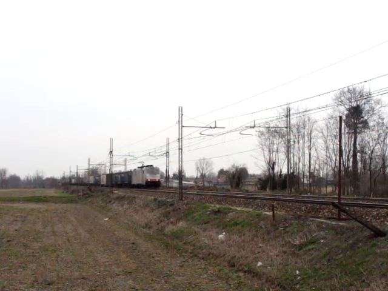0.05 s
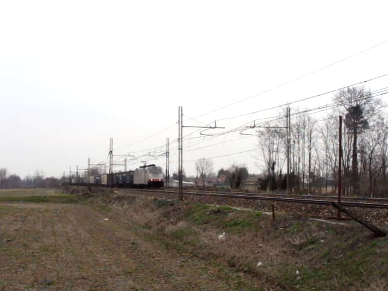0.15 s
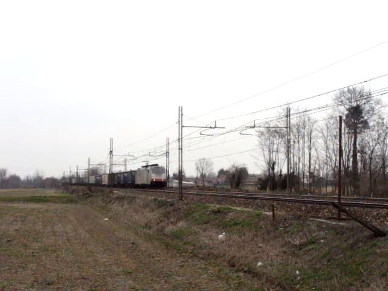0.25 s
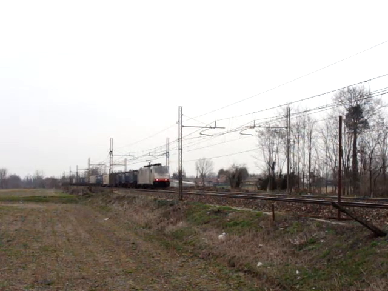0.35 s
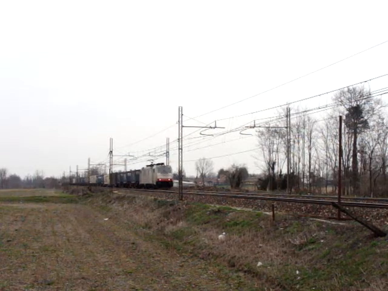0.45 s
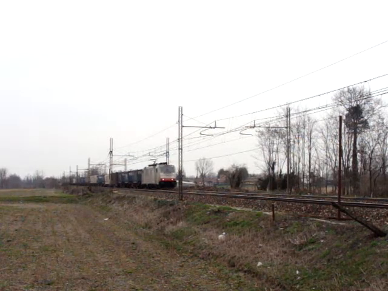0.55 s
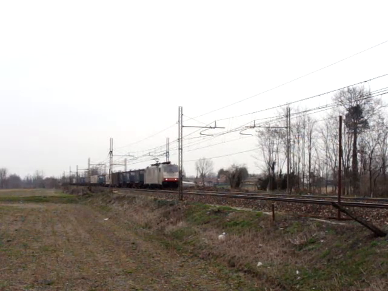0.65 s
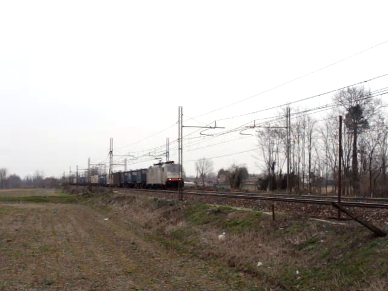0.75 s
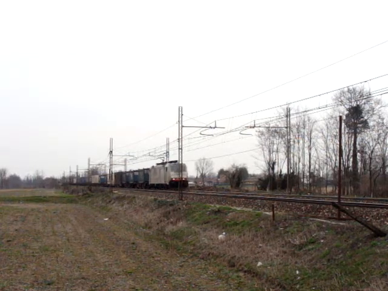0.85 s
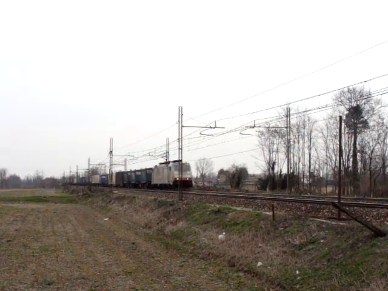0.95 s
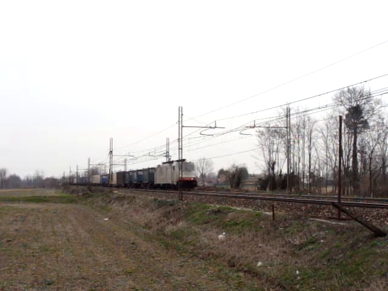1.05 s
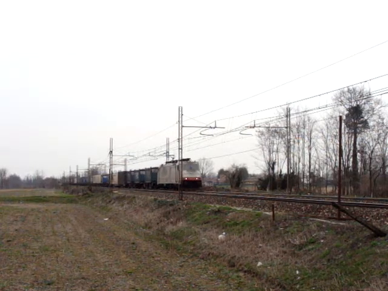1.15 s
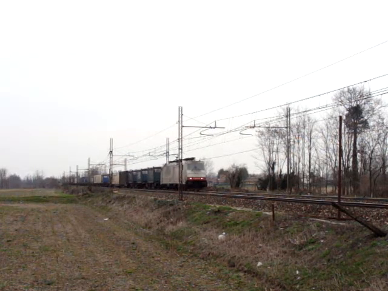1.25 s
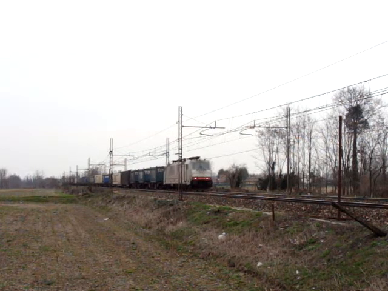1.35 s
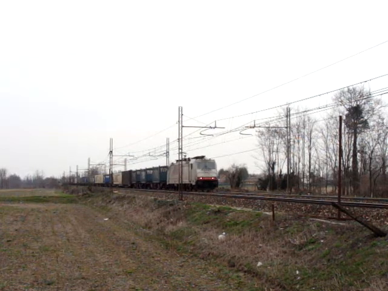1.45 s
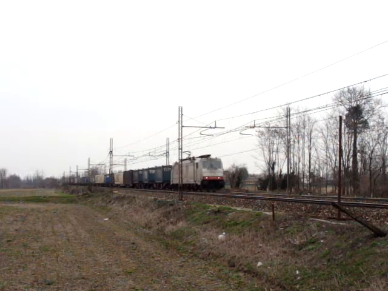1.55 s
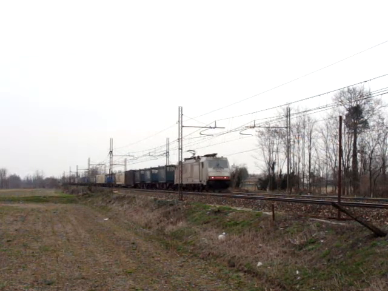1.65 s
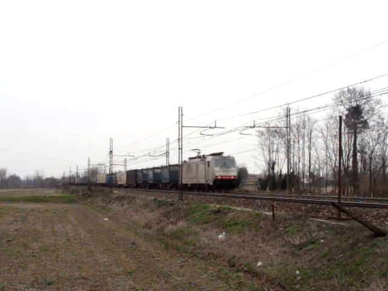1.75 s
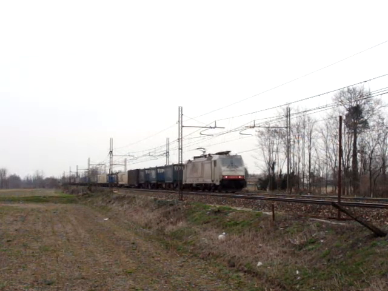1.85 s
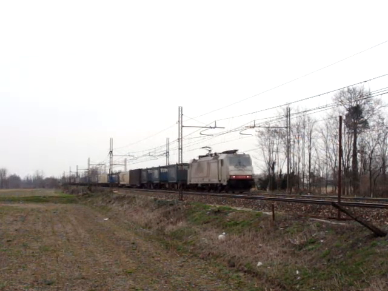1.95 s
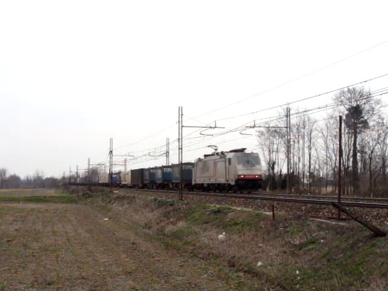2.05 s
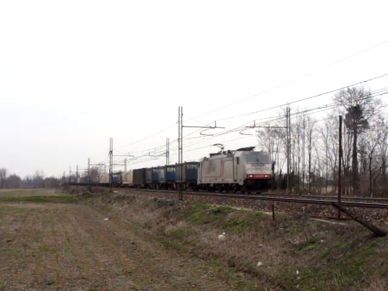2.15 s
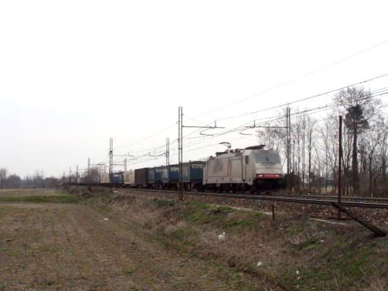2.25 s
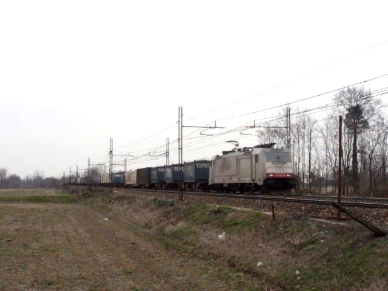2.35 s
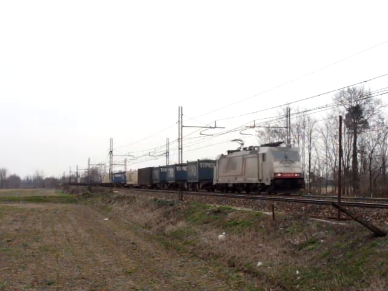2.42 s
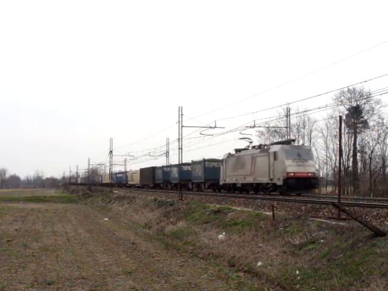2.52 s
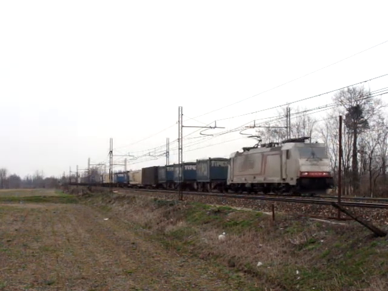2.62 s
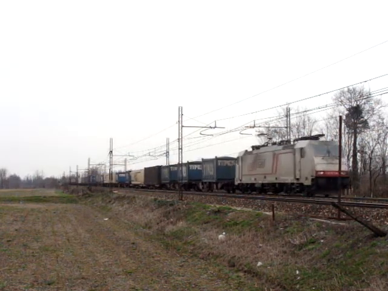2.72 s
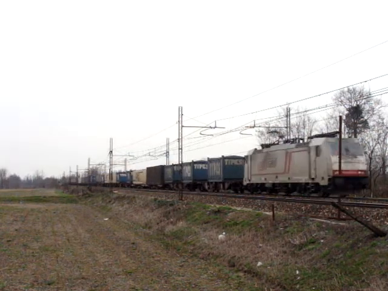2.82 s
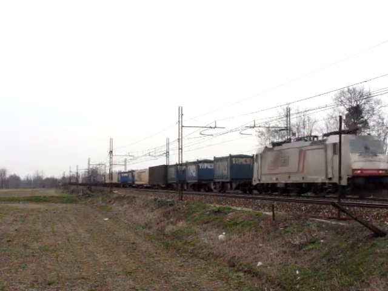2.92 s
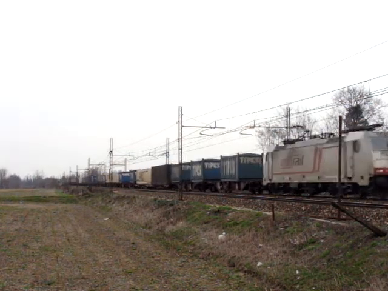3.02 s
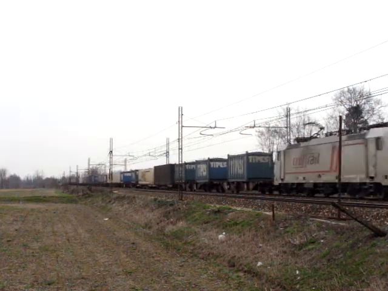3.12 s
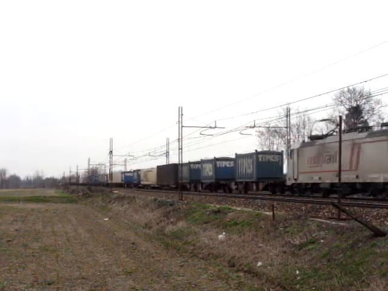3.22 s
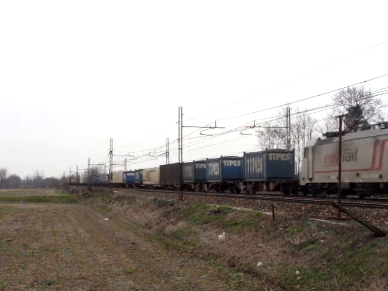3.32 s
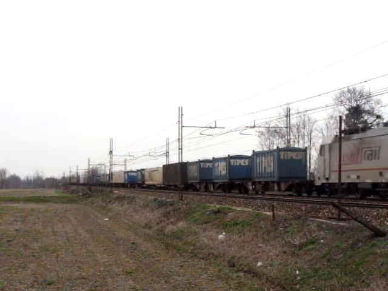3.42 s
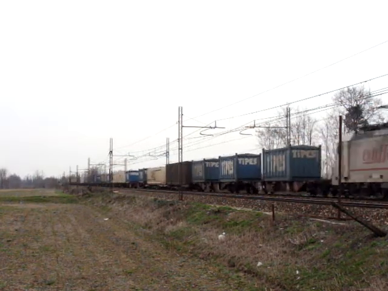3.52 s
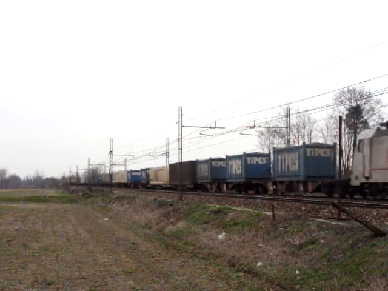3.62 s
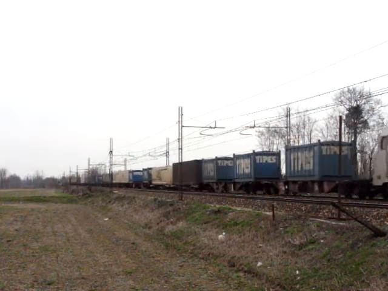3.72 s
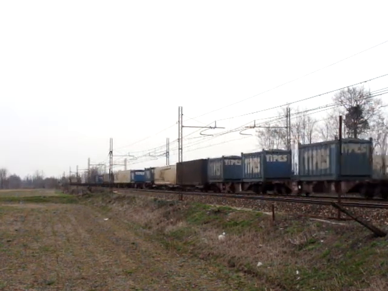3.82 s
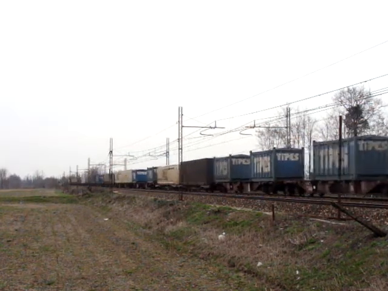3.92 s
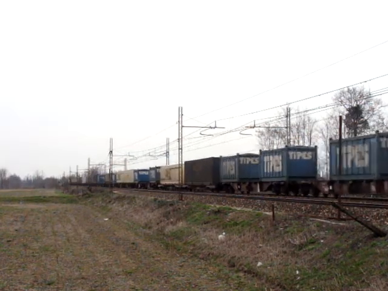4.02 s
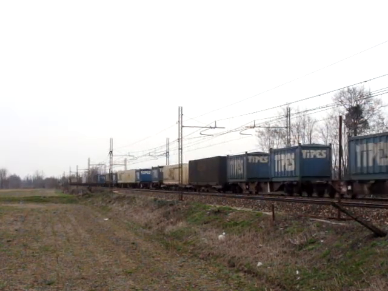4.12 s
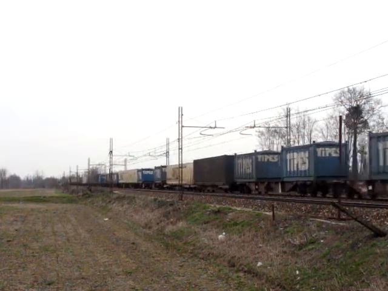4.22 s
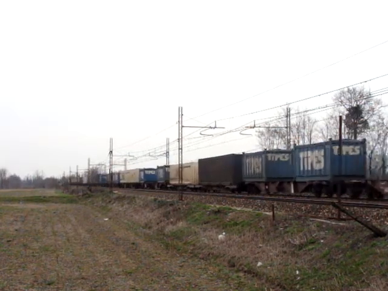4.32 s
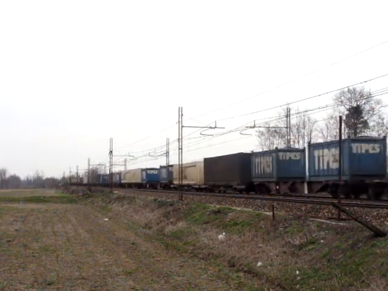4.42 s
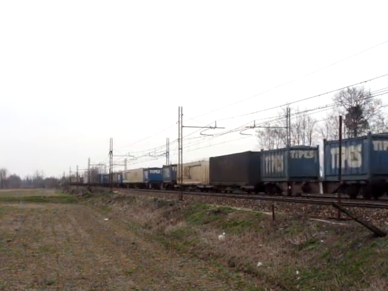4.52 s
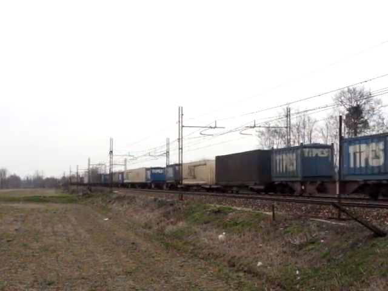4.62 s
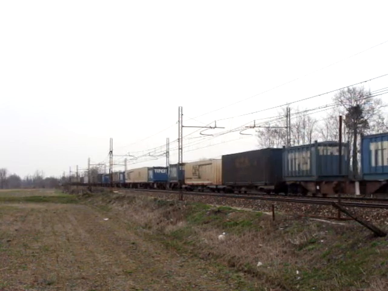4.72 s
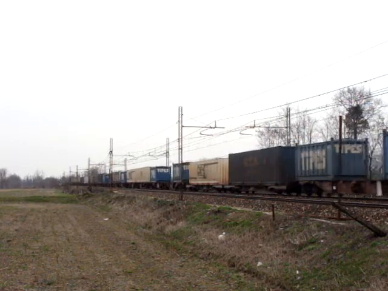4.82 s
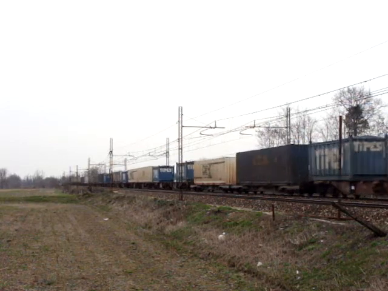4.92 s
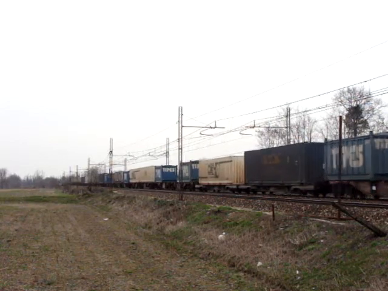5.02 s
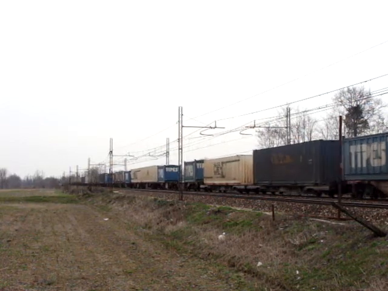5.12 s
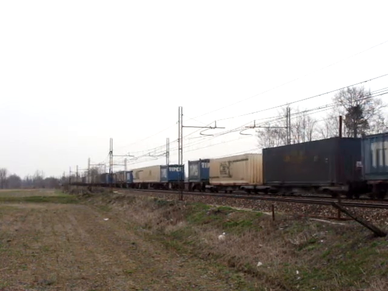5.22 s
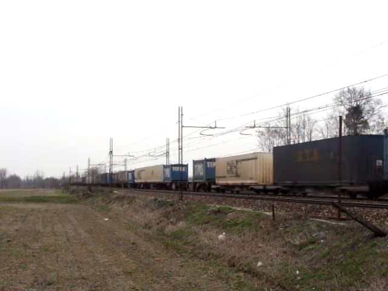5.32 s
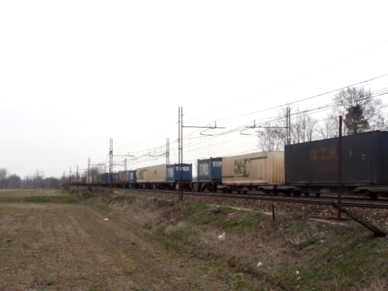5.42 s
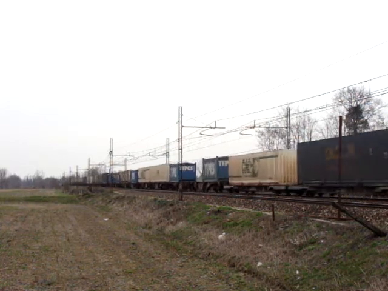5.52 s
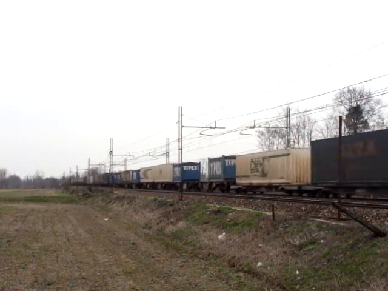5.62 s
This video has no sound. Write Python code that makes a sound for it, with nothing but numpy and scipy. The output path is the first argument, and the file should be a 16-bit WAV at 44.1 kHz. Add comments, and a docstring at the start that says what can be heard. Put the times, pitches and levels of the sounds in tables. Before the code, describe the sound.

A freight train approaches from far off, its rough wheel roar swelling to a loud rush as the locomotive thumps past, then holding.

```python
"""An electric locomotive and its freight wagons draw near along the line, the roar of rough wheels growing.
At 3.5 s the locomotive passes close by: rumble and growl surge, with a thump and a swell of air pressure.
The wagons then hold the roar; their bodies boom, and from about 4.8 s a hum in two bands fades in.
Sources are random noise shaped in frequency and level, apart from the two computed pressure pulses.
One microphone hears it all, with a faint whine and hiss, a band limit and clipped peaks."""
import sys
import numpy as np
from scipy import signal
from scipy.fft import rfft, irfft, next_fast_len
from scipy.io import wavfile
from scipy.ndimage import uniform_filter1d, map_coordinates

SR = 44100
rng = np.random.default_rng(int(sys.argv[2]) if len(sys.argv) > 2 else 0)


def to_wav(sig):
    """Store sig (one row per channel, or 1-D mono) as 16-bit WAV at the path in sys.argv[1].

    Samples outside -1..1 are clipped; the rate is SR.
    """
    pcm = np.clip(np.atleast_2d(sig), -1, 1) * 32767
    pcm = np.round(pcm).astype(np.int16)
    wavfile.write(sys.argv[1], SR, pcm.T)  # frames by channels


def convert_level_to_amplitude(level_db):
    """Map a level in decibels to its linear amplitude factor."""
    exponent = np.asarray(level_db, float) / 20
    return 10 ** exponent


N = 249606

# Spectra below are relative: each layer is scaled to rms 1 before its gain is applied.

# rail noise spectrum: pitch_hz, level_db
RAIL_SPECTRUM = [(400, -27.5), (600, -6.5), (800, 0), (1050, 0.5), (1350, -4.5), (1800, -15), (2500, -45)]
# gain of the rail: close_db, growth_db_per_db, surge_db, drop_db, drift_db_per_s
RAIL_GAIN = (-24.5, 0.65, 2.5, 2.6, 1.1)


def rail():
    """Roughness excitation: uneven surfaces under many wheels shake the rail into broadband noise."""
    noise = patchy(0.27, size=(4, 10))
    return level(RAIL_GAIN, waver_db=0.54, rate=5) * coloured(RAIL_SPECTRUM, noise)


# resonant modes of the wheels: pitch_hz, width_hz, level_db
WHEEL_MODES = [(970, 116, -5.5), (1324, 155, 1.5), (1660, 185, 0.5), (2000, 230, -3.5), (2555, 230, -3),
               (2994, 300, -1.5), (3322, 240, 1), (3600, 210, -2)]
# lower and upper bands of wheel noise: pitch_hz, level_db
WEB_SPECTRUM = [(800, -28), (1200, -3.5), (1600, -0.5), (2100, -2), (2600, -9), (3300, -29.5)]
RIM_SPECTRUM = [(1600, -30), (2200, -8), (2700, -2), (3300, 0), (4000, -1.5), (4800, -10), (6000, -21.5)]
# gains of the two bands: close_db, growth_db_per_db, surge_db, drop_db, drift_db_per_s
WEB_GAIN = (-21, 0.82, 0.6, 0.14, 1.32)
RIM_GAIN = (-17.5, 0.97, 0.5, -0.03, -0.42)


def wheels():
    """Modal resonance: noise excites the wheels, whose ringing comes and goes over the broad roar."""
    ring = unit(filtered(patchy(1.5, size=(2, 8)), resonances(WHEEL_MODES)))
    steel = patchy(0.4, size=(8, 6)) + convert_level_to_amplitude(-12.5) * ring
    web = level(WEB_GAIN, waver_db=0.0, rate=4.1) * coloured(WEB_SPECTRUM, steel)
    rim = level(RIM_GAIN, waver_db=-0.37, rate=5) * coloured(RIM_SPECTRUM, steel)
    return web + rim


# tread hiss spectrum: pitch_hz, level_db
TREAD_SPECTRUM = [(2800, -24), (4000, -4), (4800, -0.5), (6200, -1.5), (7800, -5), (8800, -12.5),
                  (9600, -16.5), (10200, -17.5)]
# gain of the hiss: close_db, growth_db_per_db, surge_db, drop_db, drift_db_per_s
TREAD_GAIN = (-22, 1.07, -0.7, 0.26, 0.24)


def treads():
    """Contact noise: the rolling treads hiss, a broad treble noise that grows as the train nears."""
    noise = patchy(1.48, size=(10, 2))
    return level(TREAD_GAIN, waver_db=0.4, rate=7.2) * coloured(TREAD_SPECTRUM, noise)


def rolling():
    """Superposition: rail, wheels and treads add, and the path through the air dulls their sum."""
    loss_per_db = 0.099  # dB lost at 4 kHz for each dB that the roar is under CLOSE_DB
    return through_air(rail() + wheels() + treads(), loss_per_db * (CLOSE_DB - roar_db()))


# spectra of the locomotive, from low to high: pitch_hz, level_db
DEEP_SPECTRUM = [(15, -18), (30, -5.5), (49, 1.5), (70, -2.5), (100, -28)]
RUMBLE_SPECTRUM = [(50, -29.5), (80, -1.5), (118, 4), (170, -1), (210, -12.5), (300, -43.5)]
GROWL_SPECTRUM = [(150, -26.5), (210, -8), (260, -1), (310, 0), (380, -6), (500, -44.5)]
# gains of the same bands: close_db, growth_db_per_db, surge_db, drop_db, drift_db_per_s
DEEP_GAIN = (-49, 0.3, 4, 9, -3)
RUMBLE_GAIN = (-44.5, .3, 2.5, 10.5, -3.5)
GROWL_GAIN = (-40, 0.53, 9, 0.7, -3)


def locomotive():
    """Band-limited noise: the heavy body rumbles, and motors and fans growl above it."""
    deep = level(DEEP_GAIN, waver_db=0.0, rate=5.5) * coloured(DEEP_SPECTRUM, white())
    rumble = level(RUMBLE_GAIN, waver_db=0.5, rate=6) * coloured(RUMBLE_SPECTRUM, white())
    growl = level(GROWL_GAIN, waver_db=0.0, rate=6) * coloured(GROWL_SPECTRUM, white())
    return deep + rumble + growl


# push of air from the locomotive's nose: start_s, thump_hz, thump_db, swell_s (start to peak), swell_db
AIR_PUSH = (3.495, 70, -30, .05, -32)


def air_push():
    """Pressure pulse: displaced air gives a decaying sine thump and a slow one-sided swell."""
    start_s, thump_hz, thump_db, swell_s, swell_db = AIR_PUSH
    t = np.clip(seconds() - start_s, 0, None)
    thump = convert_level_to_amplitude(thump_db) * np.sin(2 * np.pi * thump_hz * t) * np.exp(-t / 0.016)
    swell = convert_level_to_amplitude(swell_db) * t / swell_s * np.exp(-t / swell_s)  # peaks at 1/e of its scale
    return thump + swell


# drone of wheel frames and sleepers: pitch_hz, level_db
DRONE_SPECTRUM = [(240, -28), (340, -1.5), (440, 0.5), (540, -2), (700, -2.5), (1000, -41.5)]
# gain of the drone: close_db, growth_db_per_db, surge_db, drop_db, drift_db_per_s
DRONE_GAIN = (-29, .8, 6, 4, -.9)


def frames_and_sleepers():
    """Structure-borne sound: wheel frames and sleepers drone under the load."""
    noise = patchy(0.35, size=(2, 20))
    return level(DRONE_GAIN, waver_db=0.8, rate=4.9) * coloured(DRONE_SPECTRUM, noise)


# hum of the later wagons, in two bands: pitch_hz, level_db
HUM_SPECTRUM = [(300, -30), (360, -7), (440, -2.5), (510, -12.5), (800, -16.5), (950, -2), (1050, 1.5),
                (1200, -13), (1500, -30)]
# arrival of the hum: middle_s (half amplitude), rise_s (time constant), level_db (once arrived)
HUM_ARRIVAL = (4.76, .15, -30)


def later_wagons():
    """Band-pass noise under a logistic rise: later wagons hum in two bands."""
    middle_s, rise_s, hum_db = HUM_ARRIVAL
    arrived = 1 / (1 + np.exp((middle_s - seconds()) / rise_s))
    return convert_level_to_amplitude(hum_db) * arrived * coloured(HUM_SPECTRUM, patchy(1.3, size=(2, 12)))


# boom of the wagon bodies: pitch_hz, level_db
BODY_SPECTRUM = [(90, -29), (130, -7.5), (175, 0), (220, -1.5), (280, -30)]
# gain of the boom (its negative drop is a rise): close_db, growth_db_per_db, surge_db, drop_db, drift_db_per_s
BODY_GAIN = (-70.5, 0, .1, -12, .3)


def wagon_bodies():
    """Cavity resonance as one broad band: hollow wagon bodies boom faintly."""
    return level(BODY_GAIN, waver_db=2.5, rate=6) * coloured(BODY_SPECTRUM, white())


# microphone circuit: whine_hz, width_hz, whine_db, hiss_db
MIC_CIRCUIT = (9590.5, 60, -71.5, -67)
# spectrum of the circuit hiss: pitch_hz, level_db
MIC_HISS_SPECTRUM = [(4000, -32), (6500, -2), (7400, -4.5), (8500, -4), (10200, -5.5)]


def microphone_circuit():
    """Electronic self-noise: a steady hiss and a faint fuzzy whine of narrow-band noise."""
    whine_hz, width_hz, whine_db, hiss_db = MIC_CIRCUIT
    whine = unit(filtered(white(), lambda hz: np.exp(-((hz - whine_hz) / width_hz) ** 2)))
    hiss = coloured(MIC_HISS_SPECTRUM, white())
    return convert_level_to_amplitude(whine_db) * whine + convert_level_to_amplitude(hiss_db) * hiss


# the train draws near, then its roar holds: time_s, level_db
ROAR = [(0, -40), (.55, -37.5), (.95, -34), (1.45, -31), (1.7, -29), (2.2, -26), (2.7, -22), (2.9, -19.5),
        (3.13, -19.5), (3.42, -16.5), (3.7, -16), (4.2, -17), (4.8, -17), (5.18, -17.5), (5.3, -16.5),
        (5.66, -17.5)]


def roar_db():
    """Approach law: the level of the wheel roar, interpolated in dB."""
    time_s, level_db = np.transpose(ROAR)
    return np.interp(seconds(), time_s, level_db)


CLOSE_DB = -16  # roar level with the train alongside
PASS_S, BUILD_S, GONE_S = 3.493, 0.53, 0.24  # locomotive abreast; time constants of surge and departure


def level(layer, waver_db, rate):
    """Gain law: a layer follows the roar, surges with the locomotive, drops and drifts after it, wavers."""
    close_db, growth, surge_db, drop_db, drift = layer
    t = seconds() - PASS_S
    after = np.clip(t, 0, None)
    here = np.exp(-after / GONE_S)
    surge = np.exp(np.clip(t, None, 0) / BUILD_S) * here
    db = close_db + growth * (roar_db() - CLOSE_DB)
    db = db + surge_db * surge - drop_db * (1 - here) + drift * after
    return convert_level_to_amplitude(db + waver_db * wobble(rate))


def wobble(rate):
    """Spline interpolation: a smooth random curve with rate knots a second."""
    knots = rng.standard_normal(int(N * rate / SR) + 4)
    return map_coordinates(knots, [np.arange(N) * rate / SR])


def through_air(x, loss_db):
    """Air absorption: the loss, given in dB at 4 kHz, grows as a power of frequency."""
    hz, t, z = signal.stft(x, SR, nperseg=512)
    loss_at_4k = np.interp(t, seconds(), np.abs(loss_db))
    loss = loss_at_4k * (hz[:, None] / 4000) ** 1.9
    return signal.istft(z * convert_level_to_amplitude(-loss), SR, nperseg=512)[1][:N]


def resonances(modes):
    """Modal superposition: a causal response summing damped resonators of alternating sign."""
    def response(f):
        total = 0
        for k, (centre, width, db) in enumerate(modes):
            damping = 1j * f * width
            total = total + (-1) ** k * convert_level_to_amplitude(db) * damping / (centre * centre - f * f + damping)
        return total
    return response


def patchy(patchy_db, size):
    """Random modulation: white noise whose level wanders in patches of size (frequency bins, frames)."""
    z = signal.stft(white(), nperseg=512)[2]
    field = uniform_filter1d(rng.standard_normal(z.shape), size[0], 0)
    field = uniform_filter1d(field, size[1], 1)
    return signal.istft(z * convert_level_to_amplitude(patchy_db * unit(field)), nperseg=512)[1][:N]


def coloured(spectrum, noise):
    """Spectral shaping: noise coloured by a spectrum, rms 1."""
    return unit(filtered(noise, lambda hz: convert_level_to_amplitude(along(spectrum, hz))))


def along(points, hz):
    """Logarithmic frequency scale: (Hz, dB) points joined by lines, silent outside."""
    f, db = np.transpose(points)
    return np.interp(np.log(hz + 1), np.log(f + 1), db, left=-120, right=-120)


def filtered(x, response):
    """Linear filtering: the spectrum of x times a response of frequency."""
    m = next_fast_len(N + 8192)
    return irfft(rfft(x, m) * response(np.fft.rfftfreq(m, 1 / SR)), m)[..., :N]


def unit(x):
    """Normalisation: x scaled to rms 1."""
    return x / np.sqrt(np.mean(x ** 2) + 1e-20)


def white():
    """White noise: independent Gaussian samples."""
    return rng.standard_normal(N)


def seconds():
    """Uniform sampling: the time of each sample."""
    return np.arange(N) / SR


def scene():
    """Superposition at one microphone, which feeds both channels."""
    train = rolling() + locomotive() + air_push()
    train = train + frames_and_sleepers() + later_wagons() + wagon_bodies()
    return np.array([train, train])


def low_pass(x):
    """Removes everything above the highest recorded frequency."""
    return signal.sosfilt(signal.butter(12, 10040, fs=SR, output="sos"), x)


def record(dry):
    """Band limiting and saturation: self-noise joins, the top is cut off, the highest peaks clip."""
    top_hz, clip = 10040, 0.69  # clip as a fraction of full scale
    limited = filtered(dry + microphone_circuit(), lambda hz: hz < top_hz)
    mix = np.clip(limited, -clip, clip)
    return low_pass(mix)


dry = scene()
out = record(dry)
to_wav(out)
```